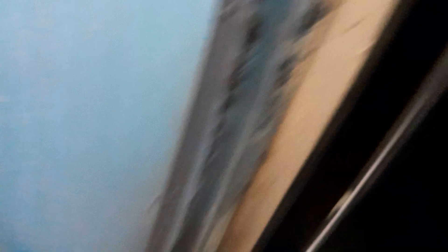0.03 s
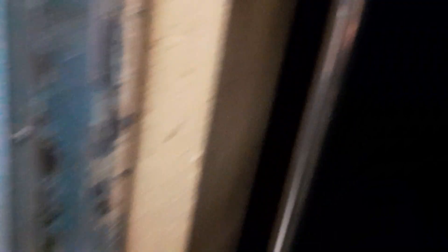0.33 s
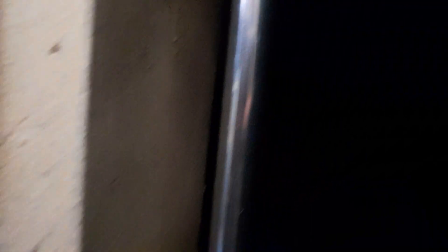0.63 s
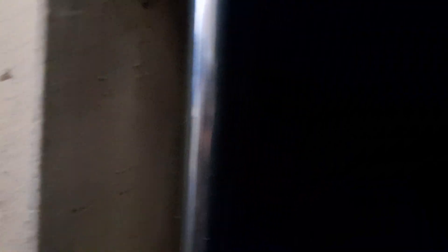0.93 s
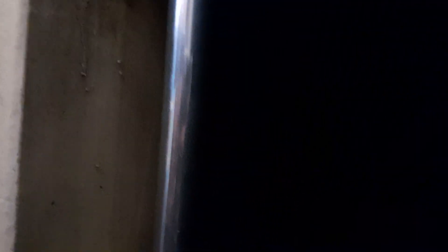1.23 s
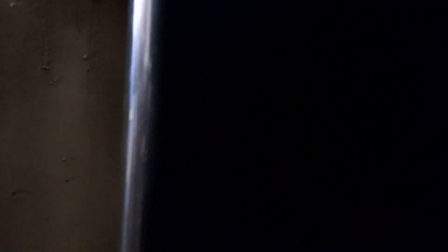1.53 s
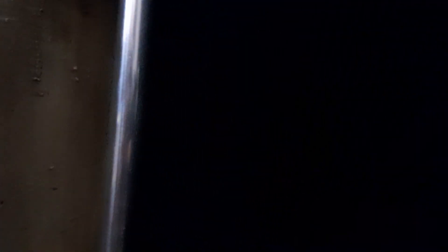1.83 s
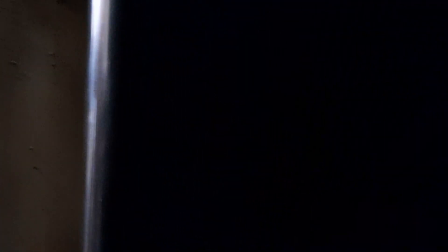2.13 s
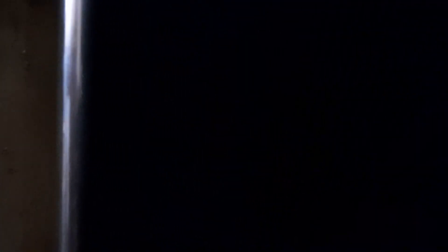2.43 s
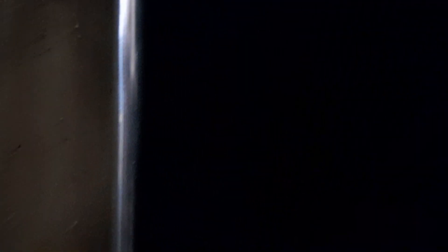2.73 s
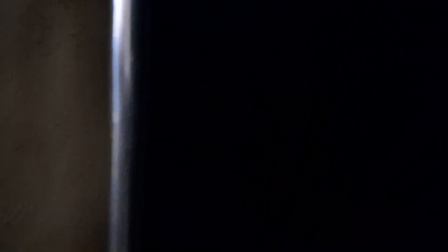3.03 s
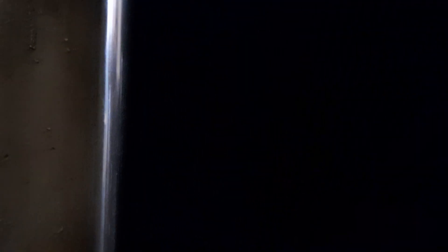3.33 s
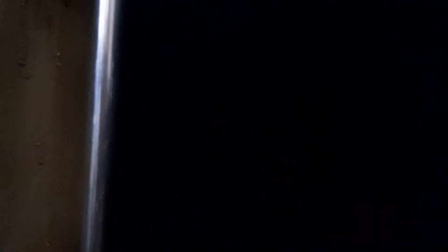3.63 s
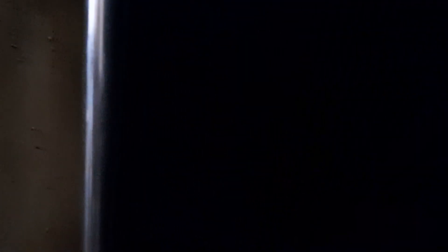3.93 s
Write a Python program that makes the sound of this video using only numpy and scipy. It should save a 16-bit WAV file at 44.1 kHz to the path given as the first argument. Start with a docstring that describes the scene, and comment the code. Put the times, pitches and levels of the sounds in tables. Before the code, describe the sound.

Train wheels roar steadily below an open coach door, clacking in pairs over rail joints and ending in a louder steel clatter. Wind buffets the microphone throughout, fluttering on the right, and two faint, thin squeaks slip through.

```python
"""At the open door of a railway coach running at speed, a stereo microphone in the slipstream.
Just below, the wheels roar and hiss on the rough rails and clack in pairs over the joints,
ringing the bogie and loose steelwork; twice a flange grazes the rail with a thin chirp.
The steel vestibule adds short reflections. Wind buffets the microphone: a deep rumble,
and on the right a dry, sputtering flutter."""
import sys
import numpy as np
from scipy.fft import rfft, irfft
from scipy.io import wavfile
from scipy.ndimage import uniform_filter1d

SR = 44100
rng = np.random.default_rng(int(sys.argv[2]) if len(sys.argv) > 2 else 0)


def wav_out(sig):
    """Save sig, one row per channel (or a flat mono array), as 16-bit PCM at SR to the path in sys.argv[1]."""
    wavfile.write(sys.argv[1], SR, np.round(np.clip(np.atleast_2d(sig).T, -1, 1) * 32767).astype(np.int16))


N = 176400
T = np.arange(N) / SR
HZ = np.maximum(np.fft.rfftfreq(N, 1 / SR), 1)

# Rolling noise from below the door; the right has an extra layer, strong for the first second.
# Each row: time in seconds, gain in dB.
ROAR_GAIN = [(0, 3), (.55, 2.5), (1.1, 0), (1.65, -1.5), (1.93, -0.5), (2.0, 4), (2.15, -1), (2.45, 0),
             (2.54, 6.5), (2.72, 0.5), (2.82, 5), (2.9, 0.5), (4, 2.5)]
HISS_GAIN = [(0, 1.5), (.42, 5), (.53, 4), (.7, 1), (1.05, -1), (1.27, 0.5), (1.65, -1), (2.35, 0),
             (2.54, 4.5), (2.83, 3.5), (3.0, 0.5), (4, 1.5)]
SIZZLE_GAIN = [(0, -24), (.52, -5), (.7, -9), (.85, -24), (2.27, -8), (2.55, -2.5), (2.96, -5), (3.55, -6),
               (3.75, -16)]
RIGHT_TRACK_GAIN = [(0, 2), (.55, 3.5), (1.0, -1), (1.06, -14)]
# The tone of those four layers. Each row: frequency in Hz, level in dB.
ROAR_TONE = [(30, -87), (180, -73.5), (300, -59.5), (480, -59), (650, -62), (950, -64), (1300, -67),
             (2000, -71.5), (2800, -86), (5000, -100)]
HISS_TONE = [(1200, -111), (2500, -74), (3200, -76), (4200, -75), (5300, -79), (6500, -80), (7500, -89.5),
             (8700, -104), (11000, -125)]
SIZZLE_TONE = [(6000, -115), (9000, -101), (12500, -92), (16000, -100)]
RIGHT_TRACK_TONE = [(200, -93), (315, -44.5), (430, -67), (800, -55), (1400, -67.5), (2400, -70.5),
                    (3500, -78.5), (6500, -88), (8000, -80), (9000, -100), (14000, -105)]
# Resonances of wheels and underframe. Each row: frequency in Hz, width in Hz, lift in dB.
UNDERFRAME_RESONANCES = [(293.5, 20, 3.5), (491, 56, 0.5), (784, 9.3, 6.5), (899, 99, 5.5), (1030, 74, 3.5),
                         (2090, 180, 5)]
# How alike the track sounds left and right. Each row: frequency in Hz, likeness from 0 to 1.
STEREO_LIKENESS = [(100, 1), (400, 0.75), (1400, 0.63), (3000, 0.03), (6000, 0.36), (12000, 0.35)]

# Wheels over joints. Each row: start in seconds, then knock, thump, clang, steel and jingle in dB.
JOINT_HITS = [(0.252, -10.5, -14, -16, -32, -56), (0.348, -10.5, -11, -26, -34.5, -55),
              (1.721, -14.5, -24, -21, -36.5, -63), (1.816, -12.5, -20, -26, -37, -57),
              (2.638, -18.5, -29, -19, -54, -61), (3.170, -8.5, -29, -14, -25, -42),
              (3.266, -7.5, -15, -12.5, -26.5, -41), (3.384, -20, -47, -28, -47, -75),
              (3.423, -12.5, -54, -24, -37.5, -53), (3.446, -22, -48, -43, -48, -58),
              (3.523, -28, -47, -43, -43, -53)]
# The tone of those five parts. Each row: frequency in Hz, relative level in dB.
KNOCK_TONE = [(120, -41), (250, -6), (350, 3), (500, 12.5), (680, 2), (900, -12), (1200, -18), (2000, -17),
              (3500, -54)]
THUMP_TONE = [(30, -33), (80, -0.5), (170, 3), (280, -1.5), (450, -3.5), (900, -68)]
CLANG_TONE = [(600, -46), (790, 8), (1030, -5), (1300, -15), (2000, -18), (3000, -51)]
STEEL_TONE = [(1200, 2.5), (2100, -3.5), (2700, 4), (3800, 4), (4800, 5.5), (6300, 1.5), (7400, -4),
              (8700, -27), (11000, -50)]
JINGLE_TONE = [(6000, -10), (9000, -10), (10500, -3), (12200, -1), (13500, -3), (16000, -9)]
# What a clack sets ringing. Each row: frequency in Hz, relative level in dB, seconds to fall 60 dB.
BOGIE_RING = [(317.6, -4.5, 0.14), (382, -11, 0.28), (500.7, -8.5, 0.18), (547, 0, 0.04), (620, -2, 0.034),
              (672, -22.5, 0.24)]
STEEL_RING = [(4330, -17, 0.3), (4880, -16, .25), (5760, -14, .3)]

# Slipstream rumble and sharp slaps on the microphone. Each row: time in seconds, left and right in dB.
RUMBLE_GAIN = [(0, -11, -11), (.25, -22.5, -18.5), (.52, -18, -19), (.61, -13.5, -10.5), (.69, -24, -19.5),
               (.81, -22, -24), (.88, -31, -15), (1.0, -20, -14.5), (1.15, -22, -22), (1.21, -25, -57),
               (2.3, -22, -54), (3.3, -22, -49), (3.65, -28.5, -55), (4, -23.5, -49)]
WIND_SLAPS = [(0.704, -9, -38), (0.906, -25, -12), (2.639, -10, -21.5)]
# Low gusts and strong flutters on the right. Each row: start in seconds, hold in seconds, level in dB.
RIGHT_GUSTS = [(0.752, 0.034, -15.5), (0.804, 0.029, -9.5), (1.988, 0.07, -28), (2.091, 0.017, -22)]
STRONG_FLUTTERS = [(1.327, 0.026, -23), (1.405, 0.015, -30), (1.572, 0.0055, -14.5), (1.606, 0.0046, -18),
                   (2.129, 0.017, -17.5), (2.196, 0.0024, -18), (2.21, 0.0034, -17.5), (2.264, 0.011, -20),
                   (2.347, .006, -20.5), (2.425, 0.0099, -25.5), (2.542, 0.0055, -11.5),
                   (2.846, 0.0077, -21), (2.918, 0.011, -23), (2.964, 0.017, -20.5), (3.046, .006, -15.5),
                   (3.115, 0.0052, -16.5), (3.138, 0.014, -19), (3.33, 0.012, -17.5), (3.484, 0.0091, -13),
                   (3.601, 0.0069, -25), (3.69, 0.015, -18), (3.926, 0.018, -18.5), (3.96, 0.011, -17.5)]
# The weak flutter between them. Each row: time in seconds, gain in dB.
WEAK_FLUTTER_GAIN = [(1.0, -54), (1.2, -28.5), (1.45, -27), (1.9, -29.5), (2.55, -23), (3.05, -30),
                     (3.5, -24), (4, -27)]
# The tone of the wind sounds. Each row: frequency in Hz, relative level in dB.
RUMBLE_TONE = [(15, -9.5), (30, -15), (48, -2), (80, 3), (125, -3), (200, -6.5), (320, -11), (600, -31),
               (1500, -38), (4000, -117)]
SLAP_TONE = [(40, -51), (120, 3), (220, 6.5), (520, -6), (900, -12.5), (2500, -46), (6000, -72)]
FLUTTER_TONE = [(120, -48), (230, -29), (330, 3), (440, 7.5), (650, 1), (950, -2), (1400, -9), (2200, -18),
                (3500, -25.5), (6000, -36), (8000, -59), (12000, -84)]

# Faint ringing of the rolling wheels. Each row: frequency in Hz, level in dB, width in Hz.
WHEEL_MODES = [(885, -42, 40), (4210, -58, 140)]
# A wheel sings out. Each row: start in seconds, hold in seconds, frequency in Hz, level in dB.
PINGS = [(.358, 0.0087, 4290, -31.5), (2.796, 0.06, 4050, -41)]
# Steel shimmer after the hardest clacks. Each row: start in seconds, hold in seconds, level in dB.
SHIMMERS = [(3.183, 0.068, -34), (3.27, 0.027, -42)]
# Flange squeaks. Each row: start in seconds, level in dB.
FLANGE_SQUEAKS = [(.478, -36.5), (2.625, -37.5)]
# The tone of shimmer and squeak. Each row: frequency in Hz, relative level in dB.
SHIMMER_TONE = [(5300, -17), (6250, -1), (7000, -26), (10500, -48), (12100, -17), (13300, -45)]
SQUEAK_TONE = [(5500, -23), (6900, 2), (7500, 9), (8100, -26)]

LEFT_LAG_S = .000055   # the track reaches the left capsule this much later
START_S, CUTOFF_HZ = .069, 15850


def rolling():
    """Roar, hiss and sizzle of steel on steel, shaken together by the roughness of the rail."""
    shake = drift(27)
    roar = track_noise(ROAR_TONE) * over_time(ROAR_GAIN) * from_db(1.55 * shake + .95 * drift(55))
    hiss = track_noise(HISS_TONE) * over_time(HISS_GAIN)
    sizzle = track_noise(SIZZLE_TONE) * over_time(SIZZLE_GAIN)
    out = roar * from_db([[.04], [0]]) + (hiss + sizzle) * from_db(.5 * shake)
    out[1] += noise(over_hz(RIGHT_TRACK_TONE)) * over_time(RIGHT_TRACK_GAIN) * from_db(.71 * shake)
    return out


def clacks():
    """Each wheel clangs and knocks the bogie; the coach thumps just after, and the steelwork rattles."""
    knock = thump = clang = steel = jingle = 0
    for s, knock_db, thump_db, clang_db, steel_db, jingle_db in JOINT_HITS:
        clang += burst(s, clang_db, rise_s=.0027, hold_s=.011, t60_s=.072)
        knock += burst(s, knock_db - 3, rise_s=.0017, hold_s=.0026, t60_s=.19)
        thump += burst(s + .008, thump_db, rise_s=.0018, hold_s=.012, t60_s=.12)
        steel += burst(s, steel_db, rise_s=.0013, hold_s=.022, t60_s=.35)
        jingle += burst(s, jingle_db, rise_s=.003, hold_s=.0078, t60_s=.31)
        crack = burst(s, 0, rise_s=.0013, hold_s=0, t60_s=.04)   # the rattle's sharp front edge
        steel += crack * from_db(steel_db)
        jingle += crack * from_db(jingle_db + 3)
    bogie = knock * evened(track_noise(KNOCK_TONE), .01)
    bogie += struck(BOGIE_RING, [(s, knock_db + 2.5) for s, knock_db, *_ in JOINT_HITS])
    rattle = steel * unit(track_noise(STEEL_TONE)) + jingle * unit(track_noise(JINGLE_TONE))
    rattle *= from_db(1.3 * drift(70))
    ring = struck(STEEL_RING, [(s, steel_db - 6) for s, *_, steel_db, _ in JOINT_HITS])
    wheel = clang * evened(track_noise(CLANG_TONE), .013)
    coach = thump * evened(track_noise(THUMP_TONE), .031)
    return (bogie + wheel) * from_db([[-1.5], [0]]) + coach + doorway(rattle) + ring


def wind_rumble():
    """Lumpy turbulence on the microphone, separate on each side, deeper right, with gusts and slaps."""
    gusts = sum(burst(s, db, .012, hold_s, t60_s=.042) for s, hold_s, db in RIGHT_GUSTS)
    levels = [over_time(RUMBLE_GAIN, column=1), over_time(RUMBLE_GAIN, column=2) + gusts]
    out = np.zeros((2, N))
    for side, db_per_octave in enumerate((0, -5)):
        colour = over_hz(RUMBLE_TONE) + db_per_octave * np.log2(np.maximum(HZ / 80, 1))
        rumble = levels[side] * evened(noise(colour), .061) * from_db(2 * drift(9.2))
        slaps = sum(burst(s, db[side], .0014, hold_s=.017, t60_s=.019) for s, *db in WIND_SLAPS)
        out[side] = rumble + slaps * evened(noise(over_hz(SLAP_TONE)), .0126)
    return out


def wind_flutter(swing_db=6.5, brighter_db_per_octave=1.5):
    """Eddies sputter across the right capsule in short bursts; the strong ones are brighter."""
    strong = sum(burst(s, db, .0012, hold_s, t60_s=.02) for s, hold_s, db in STRONG_FLUTTERS)
    weak = over_time(WEAK_FLUTTER_GAIN) * unit(from_db(swing_db * np.minimum(drift(70), 1.5)))
    soft = evened(noise(over_hz(FLUTTER_TONE)), .0106)
    sharp = evened(noise(over_hz(FLUTTER_TONE) + brighter_db_per_octave * np.log2(HZ)), .0106)
    right = (strong * sharp + weak * soft) * from_db(drift(310))
    return np.array([np.zeros(N), right])


def wheel_ring():
    """Rail roughness keeps the wheels ringing faintly, and now and then one sings out."""
    faint = sum(from_db(db + 2 * drift(10)) * wheel_mode(hz, width) for hz, db, width in WHEEL_MODES)
    pings = sum(burst(s, db, .003, hold_s, t60_s=.05) * wheel_mode(hz, width_hz=140)
                for s, hold_s, hz, db in PINGS)
    return faint * over_time(ROAR_GAIN) + pings


def singing_steel():
    """Thin steelwork shimmers just after each wheel of the hardest pair."""
    level = sum(burst(s, db, .005, hold_s, t60_s=.1) for s, hold_s, db in SHIMMERS)
    return level * unit(track_noise(SHIMMER_TONE))


def squeaks():
    """A flange grazes the rail with a thin chirp."""
    level = sum(burst(s, db, .0087, hold_s=.01, t60_s=.075) for s, db in FLANGE_SQUEAKS)
    return level * unit(track_noise(SQUEAK_TONE))


def doorway(x, delays_s=(.003, .022), echo_db=-22.5):
    """Six reflections a side, off walls close to the microphone, give a steel vestibule's hollow colour."""
    out = x.copy()
    for side in range(2):
        for lag in (rng.uniform(*delays_s, size=6) * SR).astype(int):
            out[side, lag:] += from_db(echo_db) * x[side, :N - lag]
    return out


def track_noise(tone):
    """Stereo noise from under the coach, coloured by its resonances, reaching the left a little later."""
    lift = sum(db / (1 + (2 * (HZ - hz) / width) ** 2) for hz, width, db in UNDERFRAME_RESONANCES)
    colour = over_hz(tone) + lift
    alike = np.clip(over_hz(STEREO_LIKENESS), 0, .99)
    mid = rfft(noise(colour)) * np.sqrt((1 + alike) / 2)
    side = rfft(noise(colour)) * np.sqrt((1 - alike) / 2)
    left_delay = np.exp(-2j * np.pi * HZ * LEFT_LAG_S)
    return irfft(np.array([(mid + side) * left_delay, mid - side]), N)


def struck(modes, blows):
    """Decaying modes; each blow (seconds, dB) excites them by chance amounts, different on each side."""
    out, age = np.zeros((2, N + SR)), T[:SR // 2]
    for s, blow_db in blows:
        first = int(s * SR)
        for hz, db, t60_s in modes:
            scatter_db = rng.standard_normal() + 1.4 * rng.standard_normal((2, 1))
            level = from_db(blow_db + db + scatter_db - 60 * age / t60_s) * np.minimum(age / .003, 1)
            cycles = hz * (age - np.array([[LEFT_LAG_S], [0]])) + .32 * rng.random()
            out[:, first:first + len(age)] += level * np.sin(2 * np.pi * cycles)
    return out[:, :N]


def wheel_mode(hz, width_hz, waver=.015):
    """A randomly driven wheel mode that wavers in pitch; stereo, rms 1."""
    phase = 2 * np.pi * np.cumsum(hz * (1 + waver * drift(4))) / SR
    shared, left, right = (drift(width_hz / 2) * np.cos(phase) + drift(width_hz / 2) * np.sin(phase)
                           for _ in range(3))
    return unit(shared + np.array([left, right]))


def patchy(x, groups=7, band_hz=450, swing_db=2):
    """Neighbouring bands swell and fade on their own, dealt in turn to a few drifting levels."""
    spectrum, out = rfft(x), 0
    for k in range(groups):
        share = np.maximum(1 - np.abs((HZ / band_hz + k) % groups - 1), 0)
        out += irfft(spectrum * share, N) * from_db(swing_db * drift(32))
    return out


def burst(s, db, rise_s, hold_s, t60_s):
    """Envelope starting at s seconds: rise, hold, exponential decay."""
    out, first = np.zeros(N), int(s * SR)
    age = T[:min(N - first, SR // 2)]
    fall_db = 60 * np.maximum(age - hold_s, 0) / t60_s
    out[first:first + len(age)] = np.minimum(age / rise_s, 1) * from_db(db - fall_db)
    return out


def noise(spectrum_db):
    """Noise with the given dB per Hz."""
    return irfft(rfft(rng.standard_normal(N)) * from_db(spectrum_db), N) * np.sqrt(SR / 2)


def drift(rate_hz):
    """Random wander, mostly slower than rate_hz, at rms 1."""
    return unit(irfft(rfft(rng.standard_normal(N)) / (1 + (HZ / rate_hz) ** 2), N))


def evened(x, window_s):
    """Noise held at rms 1 from moment to moment, so that an envelope sets its strength."""
    power = uniform_filter1d(np.atleast_2d(x ** 2).mean(0), max(int(window_s * SR), 2))
    return x / np.sqrt(np.abs(power) + 1e-20)


def over_time(rows, column=1):
    """Gain of a dB curve at every sample."""
    rows = np.array(rows)
    return from_db(np.interp(T, rows[:, 0], rows[:, column]))


def over_hz(points):
    """A table joined by straight lines in log frequency."""
    hz, value = np.transpose(points)
    return np.interp(np.log(HZ), np.log(hz), value)


def unit(x):
    """Scale to rms 1."""
    return x / np.sqrt(np.mean(x ** 2) + 1e-20)


def from_db(db):
    """Decibels to gain."""
    return 10 ** (np.asarray(db) / 20)


def scene():
    """Track sounds through the doorway, and wind right on the microphone."""
    track = doorway(patchy(rolling()) + squeaks()) + wheel_ring() + clacks() + singing_steel()
    return track + wind_rumble() + wind_flutter()


def record(dry):
    """The sound comes in quickly, peaks are rounded, the top is cut."""
    rounded = 1.3 * np.tanh(dry / 1.3)
    fade_in = np.clip((T - START_S) / .002, 0, 1)
    return irfft(rfft(rounded * fade_in) / np.sqrt(1 + (HZ / CUTOFF_HZ) ** 400), N)


dry = scene()
out = record(dry)
wav_out(out)
```